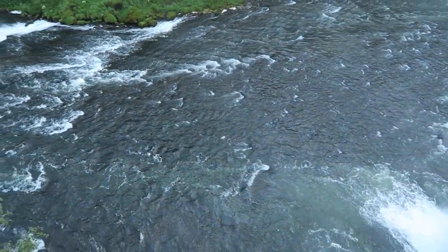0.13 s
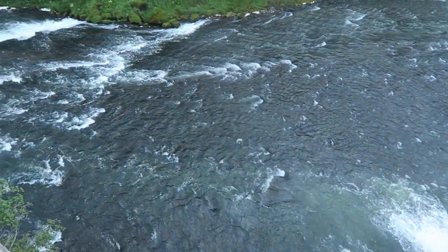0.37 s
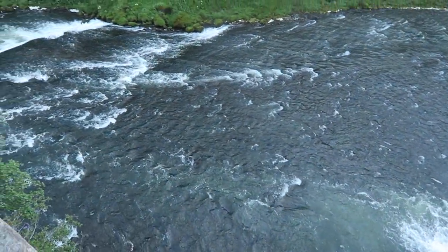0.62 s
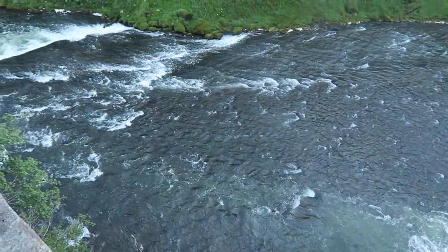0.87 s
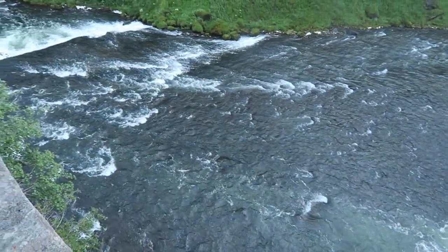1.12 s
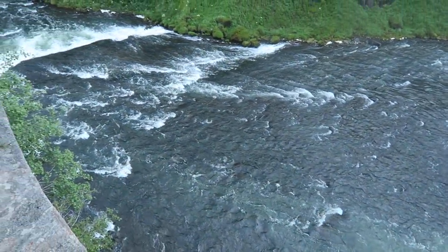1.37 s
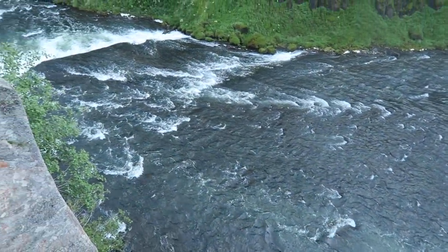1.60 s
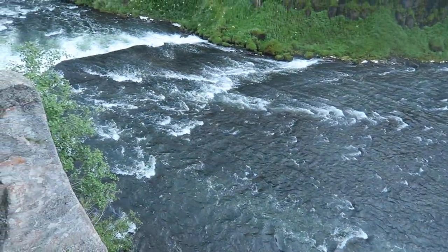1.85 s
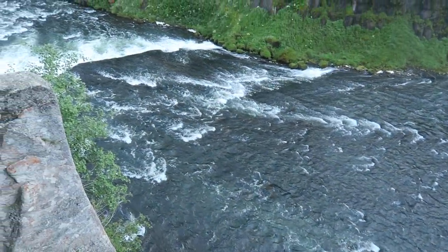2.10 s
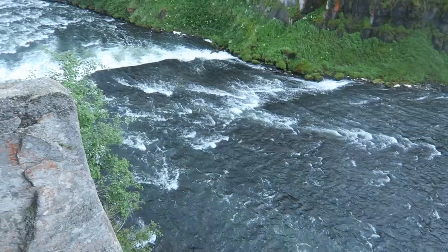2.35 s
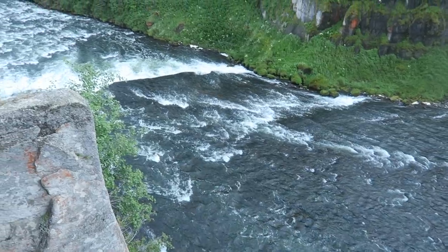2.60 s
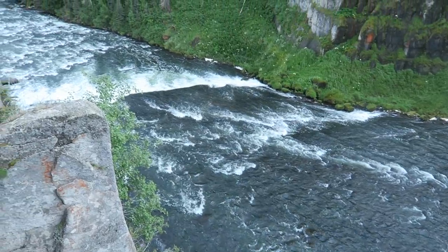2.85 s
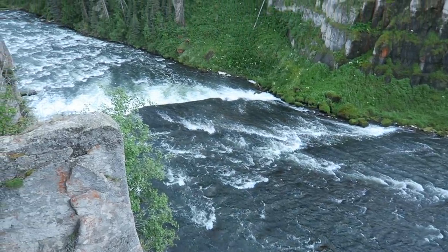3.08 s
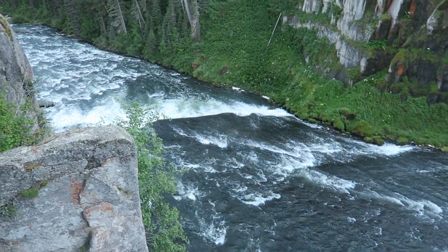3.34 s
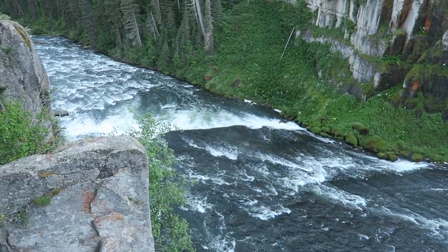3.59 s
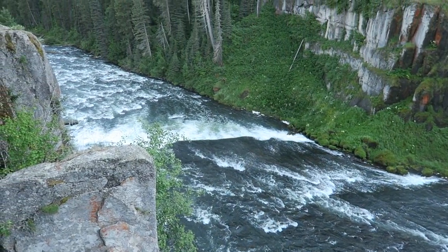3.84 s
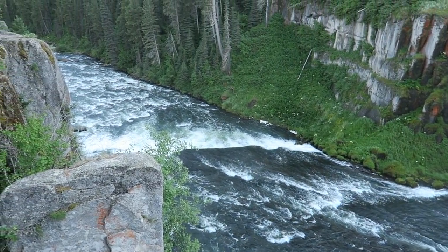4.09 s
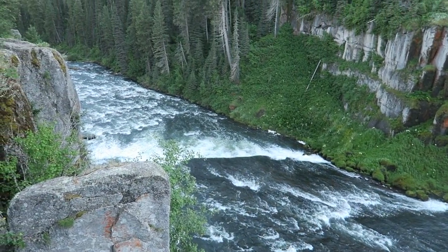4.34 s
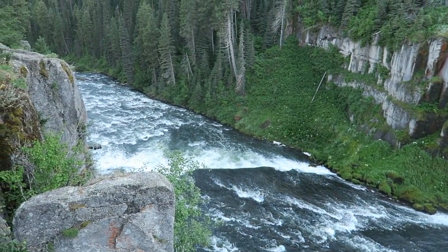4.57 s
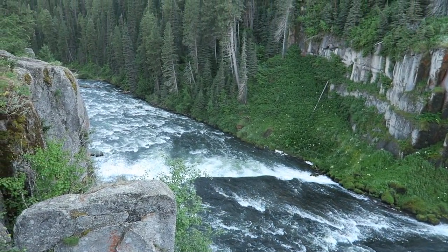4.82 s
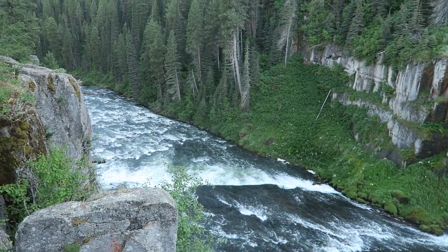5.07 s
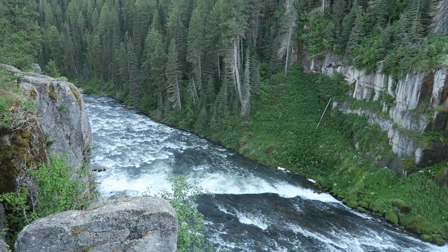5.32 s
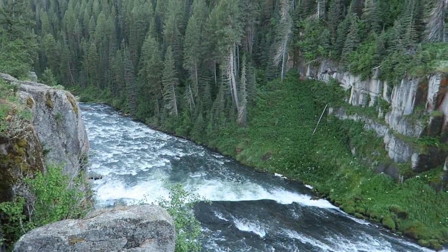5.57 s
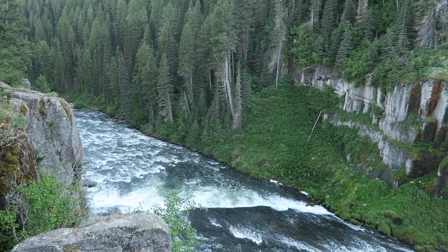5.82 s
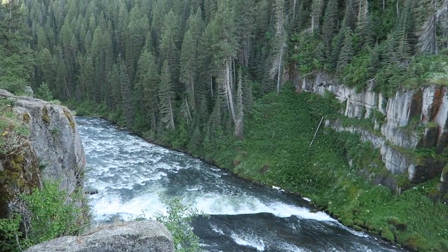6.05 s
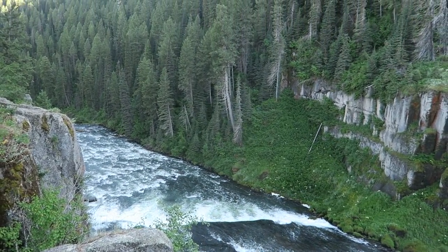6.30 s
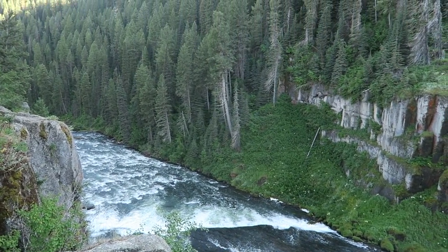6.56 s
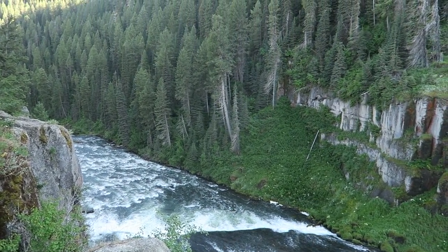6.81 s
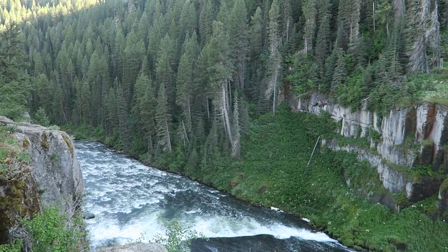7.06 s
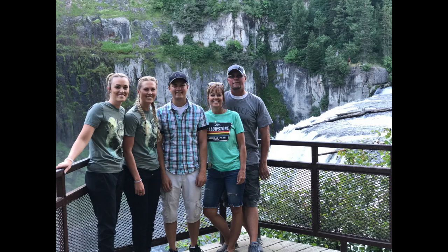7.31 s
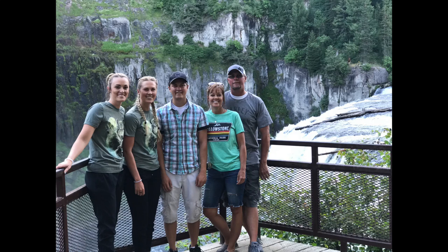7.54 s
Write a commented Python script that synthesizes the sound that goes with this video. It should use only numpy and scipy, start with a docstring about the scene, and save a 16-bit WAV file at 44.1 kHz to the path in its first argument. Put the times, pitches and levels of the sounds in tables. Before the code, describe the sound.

Full, dense roar of falling water for seven seconds, suddenly gone, leaving a tiny mechanism quietly clicking, rubbing and squeaking over faint hum.

```python
"""A large waterfall roars across a gorge: noise split into rumble, roar and spray, each with its own level.
It is heard through two close microphone ports on a camera that turns slowly, with diffuse noise at the sides.
The roar is cut off; then, in mono, a small mechanism ticks and scrapes (noise ringing a resonant body)
and squeaks (a gliding tone with overtones) over a faint mains hum (two sines)."""
import sys
import numpy as np
from scipy import signal
from scipy.fft import rfft, irfft, next_fast_len
from scipy.io import wavfile
from scipy.ndimage import uniform_filter1d, map_coordinates

SR = 44100
rng = np.random.default_rng(int(sys.argv[2]) if len(sys.argv) > 2 else 0)


def generate_wav(sig):
    """Save sig (samples, or channels by samples) to the path in sys.argv[1] as 16-bit PCM at SR."""
    pcm = np.round(np.clip(np.atleast_2d(sig).T, -1, 1) * 32767).astype(np.int16)
    wavfile.write(sys.argv[1], SR, pcm)


def field_ratio(decibels):
    """Amplitude ratio for a level in dB (20 dB per decade); scalars and array-likes work."""
    return 10 ** (np.asarray(decibels, dtype=float) / 20)


N = 338228
T = np.arange(N) / SR  # seconds
CUT_S = 7.302  # the waterfall has gone and the mechanism begins

# Spectrum of the waterfall as heard in the middle channel, with the treble cut off above 12.3 kHz.
# Each row: frequency in Hz, relative density in dB per Hz.
MIDDLE_SPECTRUM = [(15, -66), (25, -57), (45, -52), (80, -47), (140, -45), (250, -44), (450, -47),
                   (700, -48), (1200, -52), (2200, -57), (3800, -63), (5500, -70), (8000, -77),
                   (10500, -82), (12300, -88), (12700, -125), (16000, -140)]
# Spectrum of the diffuse side sound, with the treble cut off in steps above 12.3 kHz.
# Each row: frequency in Hz, relative density in dB.
DIFFUSE_SPECTRUM = [(40, -41), (130, -34), (190, -10), (450, 0.5), (520, -6), (1000, -4), (2200, -10),
                    (3800, -12.5), (7600, -11.5), (10000, -12), (12300, -15), (12900, -26), (14200, -29),
                    (15100, -38), (15300, -90)]
# Shading of the ports by the camera body. Each row: frequency in Hz, left louder by this share,
# left later by this share (in quadrature).
PORT_SHADING = [(100, 0, 0), (250, .05, 0), (450, .075, .11), (700, -.03, .15), (1200, -.07, .19),
                (2200, -.1, .29), (3800, -.09, .38), (6000, -.06, .5), (10000, 0, .5)]
# Levels as the camera turns, before surges and swells. Each row: time in seconds, low rumble in dB,
# spray in dB, diffuse roar in dB, diffuse spray in dB.
TURN_LEVELS = [(0.0, -26.5, -26, -36, -36), (0.85, -24.5, -28, -33, -35.5), (1.2, -38, -27.5, -46, -33.5),
               (1.9, -36, -28, -42, -34), (2.5, -32, -27.5, -36, -34), (2.75, -25.5, -29, -32, -37),
               (3.3, -25.5, -30.5, -33, -40), (4.2, -27, -30, -33, -39), (5.1, -27.5, -30, -32.5, -39.5),
               (5.85, -27, -30.5, -34, -39), (6.15, -26, -29.5, -33.5, -37.5), (7.3, -27.5, -30, -34, -39)]
# The roar as the camera turns, before surges and swells. Each row: time in seconds, level in dB,
# lift of its upper half in dB.
ROAR_LEVELS = [(0, -16, -1.5), (.6, -16.5, 0), (1.5, -16.5, 1), (2.5, -15.5, 1), (2.9, -16, 0), (4, -16, 0),
               (5.2, -15.5, 0), (5.8, -17, 0.3), (6.2, -15.6, 0.5), (7.28, -16.5, -1)]
# Resonances of the mechanism's body. Each row: centre in Hz, width in Hz, relative gain in dB.
BODY_MODES = [(150, 290, -13), (503, 870, -8.5), (1960, 520, -2.5), (2900, 700, -1.5), (3860, 840, -3.5),
              (5800, 1500, -13.5), (8700, 2200, -26), (13000, 1500, -37)]
# Ticks and scrapes. Each row: start in seconds, length in seconds, level in dB, relative treble in dB.
SCRAPE_STROKES = [(7.317, 0.0034, -45, -3), (7.332, .004, -42, -4), (7.374, .004, -41, -3),
                  (7.392, 0.021, -30.5, -13), (7.457, .004, -45, 0), (7.463, .008, -46, 0),
                  (7.489, .007, -42, -2), (7.509, .008, -43, -6), (7.53, .006, -47, -8),
                  (7.566, 0.015, -48, 2), (7.584, .01, -46, 8), (7.636, 0.013, -42, 7),
                  (7.652, 0.014, -39, 5)]
# Steady rubbing under the scrapes. Each row: time in seconds, level in dB before its lumps.
RUB_LEVELS = [(7.3, -85), (7.34, -60), (7.372, -74), (7.378, -54), (7.42, -50), (7.485, -47), (7.52, -41),
              (7.67, -46)]
# Glide of the squeak. Each row: time in seconds, pitch in Hz before its flutter.
SQUEAK_PITCH = [(7.515, 3443), (7.533, 3543), (7.587, 3050), (7.599, 2990), (7.619, 3015), (7.629, 3181),
                (7.643, 3543), (7.668, 3300)]
# Harmonics of the squeak. Each row: multiple of the pitch, relative level in dB.
SQUEAK_HARMONICS = [(1, -2), (2, -28), (3, -34), (4, -36)]
# Bursts of the squeak. Each row: start in seconds, length in seconds, level in dB before its flutter.
SQUEAK_BURSTS = [(7.508, .012, -41), (7.526, .01, -35), (7.54, .038, -31), (7.587, 0.013, -36),
                 (7.602, .008, -40), (7.612, 0.021, -32), (7.634, 0.034, -35)]


def unit(x):
    """Normalization: scale to rms 1."""
    return x / np.sqrt(np.mean(x ** 2) + 1e-20)


def along(points, hz):
    """Interpolation on a logarithmic frequency axis: one curve for each column after the frequency."""
    f, *columns = np.transpose(points)
    return [np.interp(np.log(hz + 1), np.log(f + 1), c) for c in columns]


def curves(rows):
    """Linear interpolation in time: one value per sample for each column after the time."""
    s, *columns = np.transpose(rows)
    return [np.interp(T, s, c) for c in columns]


def wobble(rate):
    """Slow random modulation: a smooth curve through random knots, rate of them a second (below 40)."""
    knots = rng.standard_normal(int(N * 40 / SR))
    return map_coordinates(knots, [T * rate])


def filtered(x, response):
    """Linear filtering: multiply the spectrum of x by a complex response of frequency."""
    m = next_fast_len(N + 8192)
    return irfft(rfft(x, m) * response(np.fft.rfftfreq(m, 1 / SR)), m)[..., :N]


def churn(patchy_db):
    """Nonstationary noise: patches of random gain in time and frequency."""
    z = signal.stft(rng.standard_normal(N + 512), nperseg=512)[2]
    field = uniform_filter1d(rng.standard_normal(z.shape), size=8, axis=0)
    field = uniform_filter1d(field, size=10, axis=1)
    return signal.istft(z * field_ratio(patchy_db * unit(field)), nperseg=512)[1][:N]


def mains_hum():
    """Mains vibration: a fundamental and its second harmonic, throbbing in amplitude."""
    pitch_hz, level_db, overtone_db = 59.8, -57, -12
    throbs_per_s, throb_depth = 31, .4
    tone = np.sin(2 * np.pi * pitch_hz * T)
    tone = tone + field_ratio(overtone_db) * np.sin(4 * np.pi * pitch_hz * T)
    level = np.sqrt(2) * field_ratio(level_db + 1.1 * wobble(22))
    throb = 1 + throb_depth * np.cos(2 * np.pi * throbs_per_s * (T - 7.545))
    fade_in = np.clip((T - 7.35) / .06, 0, 1)
    return level * tone * fade_in * throb


def body_response(f):
    """Modal resonance: a sum of second-order modes, alternating in sign."""
    total = 0
    for k, (centre, width, db) in enumerate(BODY_MODES):
        mode = 1j * f * width / (centre ** 2 - f ** 2 + 1j * f * width)
        total = total + (-1) ** k * field_ratio(db) * mode
    return total


def rubbing():
    """Friction noise: gritty contact rings a small body, and each stroke has its own share of treble."""
    lumps_db, lump_samples = 2, 260
    grit = rng.standard_normal(N) * field_ratio(4.9 * rng.standard_normal(N))
    dull = unit(filtered(grit, body_response))
    bright = field_ratio(-2.5) * unit(filtered(grit, lambda f: body_response(f) * f))
    # the rubbing catches and lets go
    lumps = unit(uniform_filter1d(rng.standard_normal(N), size=lump_samples))
    sound = field_ratio(curves(RUB_LEVELS)[0] + lumps_db * lumps) * dull
    for s, length, db, bright_db in SCRAPE_STROKES:
        attack = np.clip((T - s) / length / 0.26, 0, 1)
        decay = np.exp(-np.clip(T - s - length, 0, 1) / 0.0013)
        sound = sound + field_ratio(db) * attack * decay * (dull + field_ratio(bright_db) * bright)
    return sound


def squeak():
    """Stick-slip oscillation: bursts of a gliding harmonic tone, uneven in pitch and level."""
    edge_s = .005  # each burst swells and fades over this time
    bursts = 0
    for s, length, db in SQUEAK_BURSTS:
        inside_s = np.minimum(T - s, s + length + edge_s - T)
        bursts = bursts + field_ratio(db) * np.clip(inside_s / edge_s, 0, 1)
    flutter = unit(uniform_filter1d(rng.standard_normal(N), size=90))  # the slips are uneven
    hz = curves(SQUEAK_PITCH)[0] * (1 + 0.011 * flutter)
    phase = 2 * np.pi * np.cumsum(hz) / SR
    tone = sum(field_ratio(db) * np.sin(k * phase) for k, db in SQUEAK_HARMONICS)
    level_flutter = field_ratio(1.6 * np.roll(flutter, 999))  # lags the flutter of pitch
    return np.sqrt(2) * bursts * level_flutter * tone


def low_note():
    """Pure tone: a sine below the squeak fades in and stays."""
    start_s, pitch_hz, peak_db = 7.657, 1760, -33
    fade_in = np.clip((T - start_s) / .008, 0, 1)
    return field_ratio(peak_db) * fade_in * np.sin(2 * np.pi * pitch_hz * T)


def mechanism():
    """Saturation: rubbing, squeak and low note share one peak limit; the hum is added unclipped."""
    ceiling = 0.068
    sound = rubbing() + squeak() + low_note()
    sound = sound / (1 + abs(sound / ceiling) ** 6) ** (1 / 6)
    return (sound + mains_hum()) * (T > CUT_S)


def middle_colour(hz):
    """Spectral shaping: amplitude of the middle channel against frequency."""
    return field_ratio(along(MIDDLE_SPECTRUM, hz)[0])


def low_share(hz):
    """Crossover: share of power in the low band, half at 110 Hz."""
    return 1 / (1 + (hz / 110) ** 4)


def high_share(hz):
    """Crossover: share of power in the high band, half at 3500 Hz."""
    return 1 / (1 + (3500 / (hz + 1)) ** 4)


def surge_and_swell():
    """Random modulation: a quicker curve, the surge, and a slower one, the swell."""
    surges_per_s, swells_per_s = 11, 3.98
    return np.array([wobble(surges_per_s), wobble(swells_per_s)])


def diffuse_sound(spray_swing_db, rumble_db):
    """Diffuse field: noise and a little rumble that differ from port to port."""
    _, _, roar_db, spray_db = curves(TURN_LEVELS)
    noise = filtered(churn(patchy_db=0.5), lambda hz: field_ratio(along(DIFFUSE_SPECTRUM, hz)[0]))
    roar = unit(filtered(noise, lambda hz: np.sqrt(1 - high_share(hz))))
    spray = unit(filtered(noise, lambda hz: np.sqrt(high_share(hz))))
    diffuse = field_ratio(roar_db) * roar + field_ratio(spray_db) * spray
    tremor = unit(filtered(churn(patchy_db=-1), lambda hz: middle_colour(hz) * low_share(hz / 2)))
    return field_ratio(spray_swing_db) * diffuse + field_ratio(rumble_db - 28.5) * tremor


def direct_sound(heave, spray_swing_db, rumble_db):
    """Turbulent noise in three bands: a low rumble, roar of the sheet, hiss of the spray."""
    spray_db = curves(TURN_LEVELS)[1] + spray_swing_db
    roar_db, lift_db = curves(ROAR_LEVELS)
    roar_db = roar_db + np.dot((.45, 0.68), heave)  # swing in dB: surge, swell
    rumble = unit(filtered(churn(patchy_db=-0.3), lambda hz: middle_colour(hz) * np.sqrt(low_share(hz))))
    middle = lambda hz: np.sqrt(abs(1 - low_share(hz) - high_share(hz)))
    roar = unit(filtered(churn(patchy_db=0.62), lambda hz: middle_colour(hz) * middle(hz)))
    upper_roar = filtered(roar, lambda hz: 1 / (1 + (500 / (hz + 1)) ** 2))
    roar = roar + (field_ratio(lift_db) - 1) * upper_roar
    spray = unit(filtered(churn(patchy_db=1.0), lambda hz: middle_colour(hz) * np.sqrt(high_share(hz))))
    return field_ratio(rumble_db) * rumble + field_ratio(roar_db) * roar + field_ratio(spray_db) * spray


def port_shade(direct):
    """Diffraction: the camera body makes the direct sound differ in level and phase between the ports."""
    def difference(hz):
        louder, later = along(PORT_SHADING, hz)
        return louder - 1j * later
    return filtered(direct, difference)


def waterfall():
    """Sum and difference: direct sound is common to both ports, shading and diffuse sound are opposed."""
    heave = surge_and_swell()  # shared by roar, spray and diffuse sound
    # swings in dB: surge, swell
    spray_swing_db = np.dot((0.44, 1), heave)
    rumble_db = curves(TURN_LEVELS)[0] + np.dot((2.1, 1), surge_and_swell())  # the rumble swings on its own
    direct = direct_sound(heave, spray_swing_db, rumble_db)
    side = port_shade(direct) + diffuse_sound(spray_swing_db, rumble_db)
    cut = np.clip((CUT_S - T) / 0.01, 0, 1)
    return cut * np.array([direct + side, direct - side])


def scene():
    """Superposition: the fall, then the mechanism in the centre."""
    return waterfall() + mechanism()


def low_pass(x):
    """Removes everything above the highest recorded frequency."""
    return signal.sosfilt(signal.butter(12, 15700, fs=SR, output="sos"), x)


def record(dry):
    """Transmission: the finished mix is passed on."""
    return low_pass(dry)


dry = scene()
out = record(dry)
generate_wav(out)
```